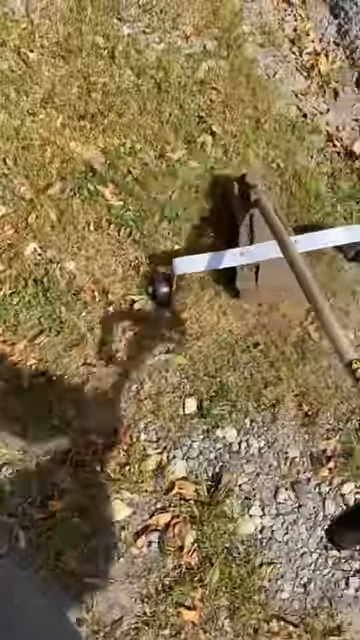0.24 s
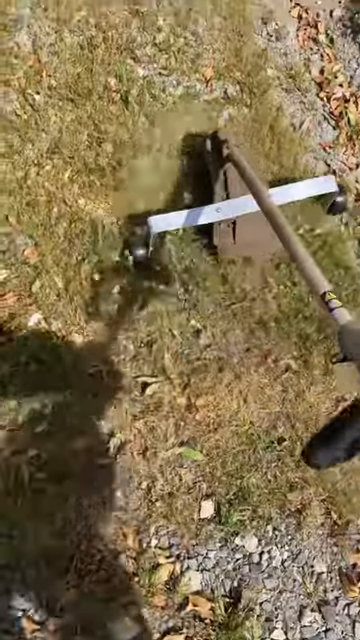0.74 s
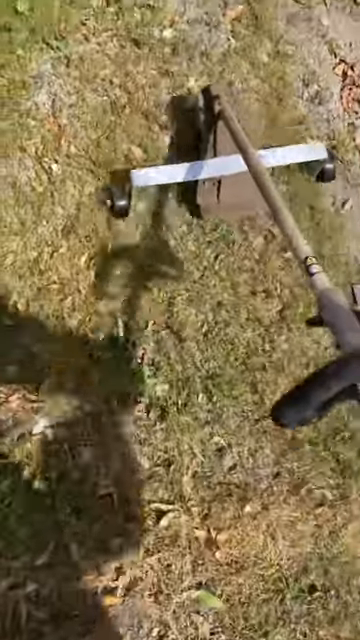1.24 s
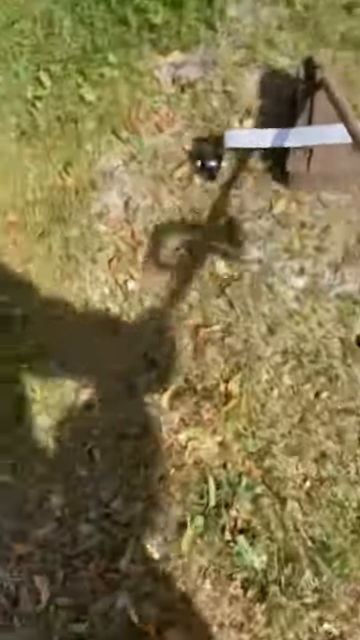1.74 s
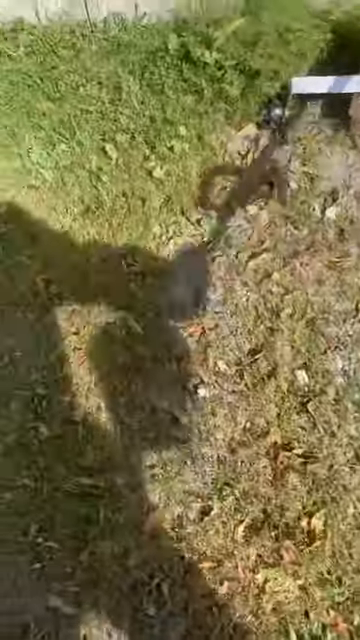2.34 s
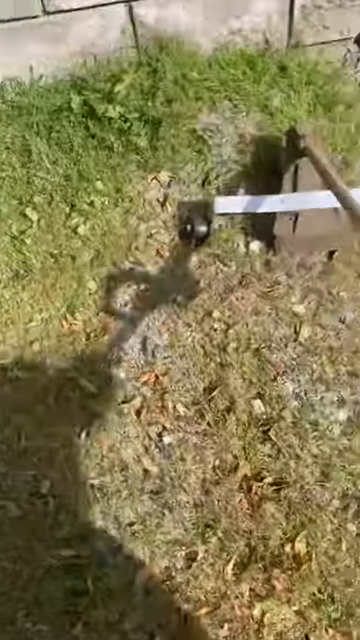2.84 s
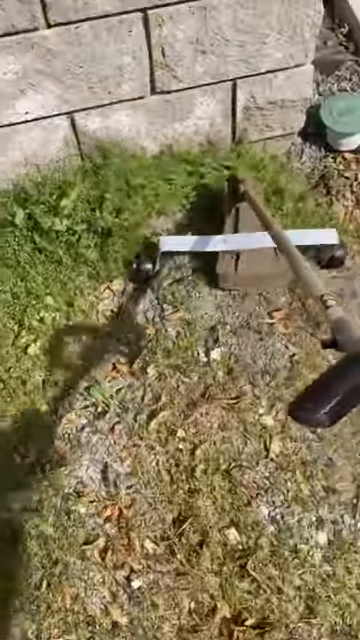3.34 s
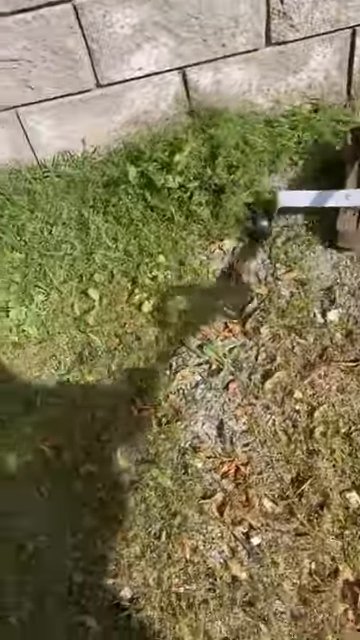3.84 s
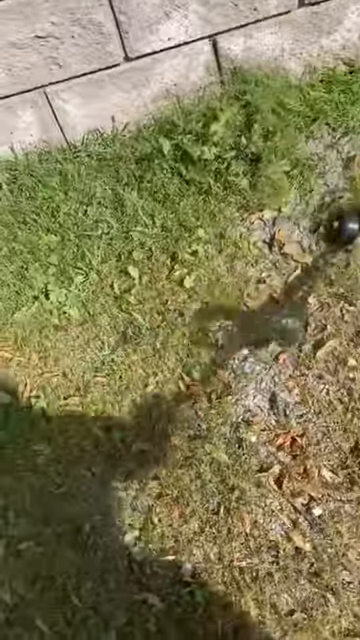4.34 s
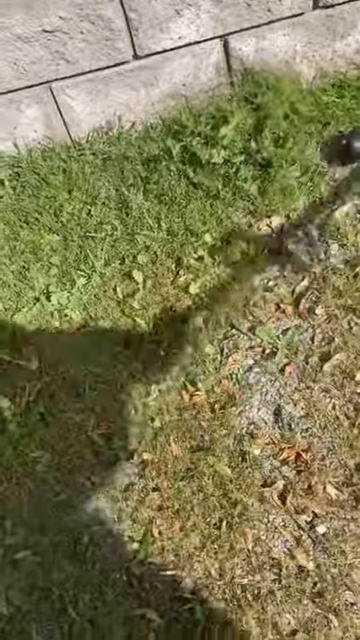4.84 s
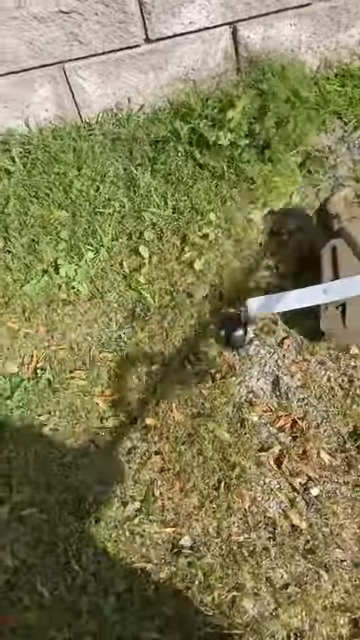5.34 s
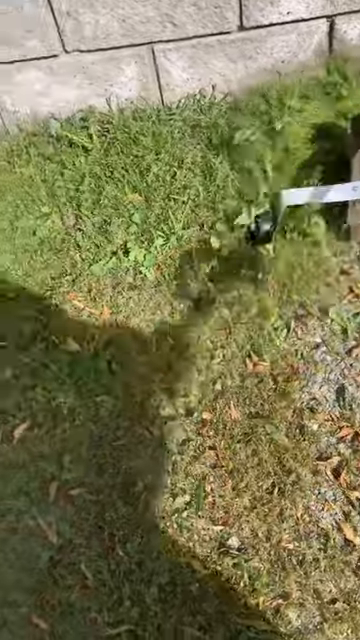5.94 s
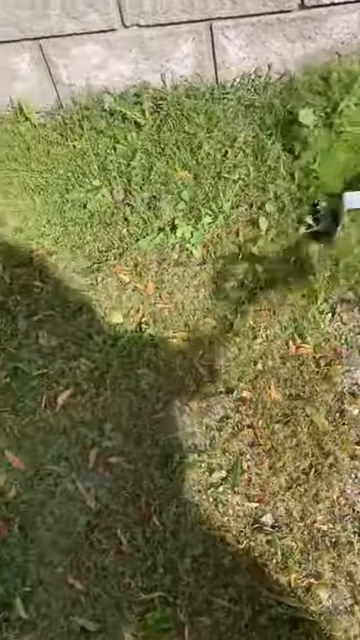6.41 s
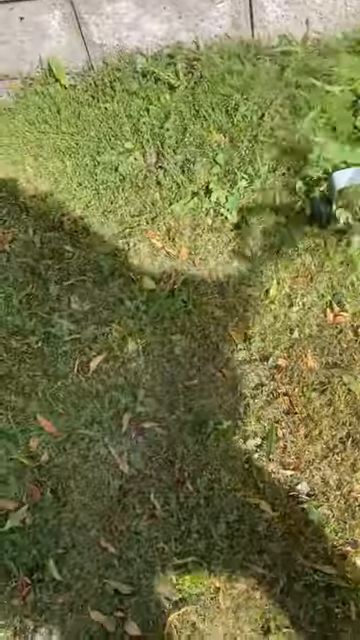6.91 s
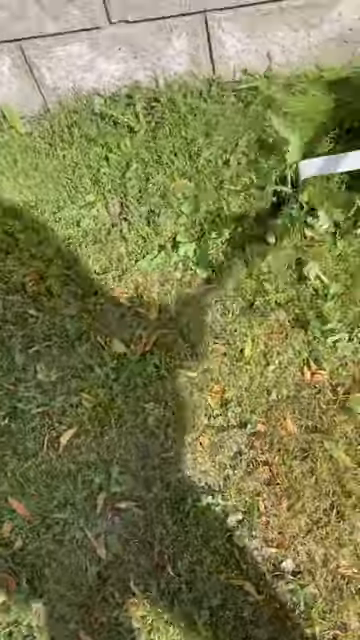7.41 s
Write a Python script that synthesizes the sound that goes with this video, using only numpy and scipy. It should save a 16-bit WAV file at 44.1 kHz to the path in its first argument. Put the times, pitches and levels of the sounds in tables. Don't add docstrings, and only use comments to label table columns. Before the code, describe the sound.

A small two-stroke engine rasps and whines without pause, its pitch dipping briefly when the head bites into dense grass near a stone wall. Above it the cutting strands whip past with dense, sizzling hiss and crisp shredding. Bright isolated ticks and one hard burst come from flung stones. Close, dry outdoor stereo from a body-worn microphone, engine and head spread differently, with light wind bumps.

```python
import sys
import numpy as np
from scipy import signal
from scipy.fft import rfft, irfft
from scipy.io import wavfile
from scipy.ndimage import uniform_filter1d

SR = 44100
rng = np.random.default_rng(int(sys.argv[2]) if len(sys.argv) > 2 else 0)


def gain_from_db(level_db):
    decades = np.asarray(level_db, float) / 20
    return 10 ** decades


def unload_audio(sound):
    columns = np.transpose(np.atleast_2d(sound))
    steps = np.round(np.clip(columns, -1, 1) * 32767)
    wavfile.write(sys.argv[1], SR, steps.astype(np.int16))


N = 338247
GEAR = 1.4


def rms_one(x):
    return x / np.sqrt(np.mean(x ** 2) + 1e-20)


def in_time(rows):
    s, *columns = np.transpose(rows)
    return [np.interp(np.arange(N) / SR, s, c) for c in columns]


def drift(rate_hz):
    pole = np.exp(-80 * np.pi * rate_hz / SR)
    noise = rng.standard_normal(N // 40 + 2002)
    slow = signal.lfilter([1], [1, -2 * pole, pole * pole], noise)[2000:]
    return np.interp(np.arange(N) / 40, np.arange(len(slow)), rms_one(slow))


def coloured(x, spectrum, patchy_db):
    hz = np.fft.rfftfreq(N, 1 / SR) + 1
    point_hz, point_db = np.transpose(spectrum)
    shaped = rfft(x) * gain_from_db(np.interp(np.log(hz), np.log(point_hz), point_db, -70, -70))
    half_octave = 2 * np.log2(hz / point_hz[0])
    bands = int(2 * np.log2(point_hz[-1] / point_hz[0])) + 2
    out = 0
    for k in range(bands):
        share = np.clip(1 - np.abs(half_octave - k), 0, 1)
        out = out + irfft(shaped * share, N) * gain_from_db(patchy_db * drift(16))
    return rms_one(out)


def grains(spread_db, per_s):
    sizes = gain_from_db(spread_db * np.minimum(rng.exponential(1, N), 4)) * rng.choice([-1, 1], N)
    return rms_one(sizes * (rng.random(N) < per_s / SR))


def gate(turns, sharp):
    return rms_one(np.exp(sharp * np.cos(2 * np.pi * turns)))


def order(turns, level_db, apart_db, phase):
    angle = 2 * np.pi * (turns + rng.random())
    apart = gain_from_db(apart_db + 2.7 * drift(2.4)) * np.sin(angle + phase)
    return np.sqrt(2) * (gain_from_db(level_db) * np.sin(angle) + apart * [[1], [-1]])


def ports(x, lead, left_db):
    half = np.exp(.5j * np.interp(np.fft.rfftfreq(N, 1 / SR), *np.transpose(lead)))
    pair = np.array([irfft(rfft(x) * half, N), irfft(rfft(x) / half, N)])
    return pair * gain_from_db([[left_db / 2], [-left_db / 2]])


# t/s, firing rate f/Hz
SPEED = [(0, 147.6), (.14, 148.6), (.26, 147.7), (.67, 147.8), (.81, 146.6), (1.11, 149), (1.51, 149),
         (1.63, 148.2), (1.79, 148.9), (2.14, 147), (2.37, 148.4), (2.9, 148.1), (3.07, 146.8),
         (3.25, 148.1), (3.42, 148.1), (3.55, 145), (3.66, 142), (3.78, 146), (3.92, 148.7), (4.23, 148.2),
         (4.4, 148.2), (4.57, 148.6), (4.72, 147.7), (4.81, 148.5), (5.25, 148.9), (5.53, 147.7),
         (5.69, 145), (5.8, 143.4), (5.99, 147.1), (6.11, 148.1), (6.48, 147.7), (6.65, 146.2), (6.85, 148),
         (6.99, 147), (7.38, 148), (7.5, 143), (7.6, 140.5), (7.67, 141)]


def engine_turns():
    return np.cumsum(in_time(SPEED)[0]) / SR


# t/s, third-order level/dB, sixth-order level/dB
ENGINE = [(0.0, -46, -54), (0.06, -32.5, -43), (0.21, -40.5, -45), (0.43, -36.5, -36), (0.83, -39.5, -47),
          (0.96, -37, -40), (1.13, -37.5, -45), (1.24, -36.5, -38), (1.32, -37, -48), (1.62, -34, -39),
          (1.69, -34.5, -48), (1.86, -33.5, -43), (2.05, -40, -34), (2.14, -35, -56), (2.18, -35.5, -47),
          (2.69, -40, -47), (2.76, -35, -54), (2.8, -38, -39.5), (3.57, -29.5, -43.5), (3.61, -32, -46),
          (3.82, -28, -39), (3.93, -36.5, -41), (4.27, -45.5, -46), (4.42, -27.5, -38.5),
          (4.49, -30.5, -46), (4.7, -28.5, -43), (4.85, -33, -47), (4.89, -28, -40.5), (5.08, -31.5, -38.5),
          (5.21, -54, -52), (5.26, -40, -57), (5.3, -41, -43), (5.51, -47, -43), (5.53, -53, -35),
          (5.66, -41.5, -43), (5.9, -33, -37.5), (5.96, -32, -50), (6.0, -36, -41), (6.26, -55, -38),
          (6.32, -38.5, -52), (6.37, -47, -49), (6.43, -39, -44), (6.47, -41, -49), (6.51, -35, -39),
          (6.58, -36, -50), (6.69, -30, -39), (6.86, -37, -49), (6.96, -35.5, -40.5), (7.18, -44.5, -50),
          (7.22, -52, -47), (7.28, -42, -53), (7.46, -33.5, -47), (7.54, -57, -44), (7.67, -45, -45)]
# multiple of the firing rate [1], level/dB, follows third (0) to sixth (1) order [1],
# port difference level/dB, its phase [rad]
EXHAUST = [(1, -20.5, 0.46, -88, 3.1), (2, -29.5, 0, -82, 3), (3, 1.5, 0.062, -43.5, 1.67),
           (4, -10.5, 0, -60, 1.5), (5, -27, 1, -74, -8), (6, -2, 0.71, -46, -5.5),
           (7, -4, 0.96, -48.5, -1.1), (9, -14.5, 0.58, -54, 1), (15, -10, 0.83, -49.5, -2.7)]


def exhaust_tone(turns):
    third_db, sixth_db = in_time(ENGINE)
    turns = turns + .016 * drift(30)
    out = 0
    for k, level_db, high, apart_db, phase in EXHAUST:
        level_db = level_db + (1 - high) * third_db + high * sixth_db + 2.07 * drift(14.5)
        out = out + order(k * turns, level_db, apart_db, phase)
    return out


# t/s, level/dB
GAS = [(0.0, -35), (0.13, -37), (1.0, -41), (1.81, -41), (1.96, -39), (2.29, -37.5), (2.56, -39.5),
       (3.33, -39.5), (3.67, -38), (4.12, -41), (4.83, -39), (5.04, -39.5), (5.26, -40.5), (5.47, -41.5),
       (5.85, -40), (6.02, -41), (6.56, -40), (7.26, -41.5), (7.67, -37)]
# f/Hz, level/dB
RASP = [(100, -14.5), (320, -13), (390, -2.5), (500, 2), (700, 0), (1000, 1.5), (1400, -0.5), (2200, -1),
        (3200, -1.5), (5000, -15)]
# f/Hz, lead [rad]
ENGINE_LEAD = [(300, -1.3), (800, 0), (1500, -1.44), (2300, -1.5), (3500, -3), (5000, -4)]
# f/Hz, lead [rad]
TURNED_LEAD = [(300, -2.2), (800, -0.5), (1500, -1), (2000, -2), (2700, -3.1), (5000, -5)]
# t/s, share turned [1]
TURNING = [(0, 0), (4.6, .1), (5.9, 0.92), (7.67, 0.96)]


def exhaust_rasp(turns):
    puffs = gate(turns, .17) * rng.standard_normal((3, N))
    rasp = coloured(puffs[0], RASP, 1.5)
    turned = np.clip(in_time(TURNING)[0], 0, 1)
    direct = (1 - turned) * ports(rasp, ENGINE_LEAD, 0.86) + turned * ports(rasp, TURNED_LEAD, 1.0)
    scattered = coloured(puffs[1:], RASP, 1.5)
    high_pass = signal.butter(2, 950, "high", fs=SR, output="sos")
    scattered = signal.sosfilt(high_pass, scattered)
    return gain_from_db(in_time(GAS)[0] + 6.5) * (direct + gain_from_db(-2.5) * scattered)


# t/s, strand tone level/dB, hiss level/dB, shredding level/dB, whip crack over hiss level/dB
HEAD = [(0.0, -48, -19.5, -36, -9), (0.02, -43, -20, -35, -12), (0.19, -45, -23.5, -32.5, -8),
        (0.4, -46, -22, -34.5, -1.5), (0.58, -53.5, -26.5, -38, -3.5), (1.28, -42.5, -27, -34.5, -1),
        (1.69, -41, -28, -42, -4.5), (1.79, -40, -26, -33, -4.5), (1.96, -44, -26.5, -41, -9),
        (2.11, -44, -28, -33.5, -2), (2.16, -43.5, -28.5, -40, -5), (2.18, -51, -27, -39, -7.5),
        (2.48, -51, -27, -40, -5.5), (2.58, -42, -27.5, -37, -4.5), (3.07, -42.5, -27, -35, -7.5),
        (3.18, -42, -26, -45, -7), (3.22, -46, -26, -57, -5), (3.27, -48, -28, -35, -11),
        (3.29, -48, -27, -44, -1), (3.42, -48, -26, -37, -12), (3.48, -57, -25.5, -32, -15),
        (3.54, -38.5, -26, -28, -8), (3.65, -41, -27.5, -25.5, -8), (3.76, -55, -26.5, -33.5, -9),
        (3.84, -44, -27, -39, -9), (3.97, -41, -28, -38.5, -4), (4.46, -40, -27.5, -42, -9.5),
        (4.8, -39, -29.5, -36, -8), (5.13, -42, -26.5, -39, -8.5), (5.15, -39, -27.5, -45, -12),
        (5.28, -46, -24.5, -47.5, -8), (5.57, -42.5, -25.5, -36.5, -7.5), (5.68, -39, -25, -31, -7),
        (5.7, -40, -24.5, -35, -7), (5.85, -45, -27, -30, -8.5), (5.9, -56, -27, -31.5, -7),
        (5.98, -57.5, -27.5, -39.5, -13), (6.07, -62, -28.5, -37, -7), (6.13, -62, -27.5, -49, -3.5),
        (6.22, -43, -28, -32.5, -13), (6.3, -51, -26, -46, -10), (6.37, -43, -27.5, -31.5, -9),
        (6.45, -66.5, -27, -48, -8), (6.53, -47, -26.5, -36, -7), (6.58, -64, -27.5, -33, -13),
        (6.62, -51, -25, -30, -7), (6.79, -48.5, -28.5, -38, -1), (6.88, -53, -26.5, -43, -13),
        (7.18, -48, -27, -35.5, -9.5), (7.24, -60, -26, -34, -6), (7.37, -53, -24.5, -43.5, -7),
        (7.43, -35.5, -27.5, -29, -5.5), (7.63, -38.5, -27, -30.5, -5), (7.67, -39, -26, -36, -13)]


def cutting_head(turns):
    tone_db, hiss_db, shred_db, crack_db = in_time(HEAD)
    return strand_tone(turns, tone_db) + strand_noise(turns, hiss_db, shred_db, crack_db)


# t/s, level/dB
THIRD_PASS = [(0.0, -36.5), (0.53, -38.5), (0.75, -44), (0.94, -40.5), (2.26, -43), (2.43, -34.5),
              (2.88, -51.5), (3.44, -37), (3.63, -42), (3.99, -40), (4.18, -48), (4.51, -44), (5.0, -44),
              (5.23, -45), (5.4, -41.5), (5.6, -46), (6.02, -40.5), (6.24, -54), (6.56, -37.5), (7.09, -50),
              (7.33, -42), (7.67, -44)]
# multiple of head turns [1], level/dB, port difference level/dB, its phase [rad]
HEAD_ORDERS = [(1, -62.5, -69, -3), (4, -47, -50, 2)]


def strand_tone(turns, tone_db):
    out = order(2 * turns, tone_db + .8 * drift(12), -58.5, -1.5)
    out += order(6 * turns, in_time(THIRD_PASS)[0] - 1.5 + 1.2 * drift(13), -51.5, 3.0)
    for k, level_db, apart_db, phase in HEAD_ORDERS:
        out += order(k * turns, level_db + 2.1 * drift(15), apart_db, phase)
    return out


# f/Hz, level/dB
HISS = [(3000, -24), (4000, -12), (5000, -12.5), (5600, -7.5), (6500, -1.5), (7400, -3), (8400, -2),
        (10000, -3.5), (12000, -7), (13500, -13), (16000, -19)]
# f/Hz, level/dB
WHIP = [(4500, -24.5), (6200, -6.5), (7200, -4.5), (8500, 6.5), (9600, 1.5), (11000, -5.5), (13000, -20)]
# f/Hz, level/dB
SHRED = [(600, -49), (1500, 7.5), (3000, 3), (4500, 11), (8000, -0.5), (16000, -96)]
# f/Hz, level/dB
SPRAY = [(9000, -41), (12500, 3), (14000, 6), (16000, -16)]
# f/Hz, lead [rad]
HEAD_LEAD = [(300, 0), (3000, -5.4), (4200, -4.5), (5400, -3.14), (8350, 0), (12000, 3.14), (15200, 6.28),
             (20000, 9)]


def strand_noise(turns, hiss_db, shred_db, crack_db):
    turns = turns + .45
    passes = gate(2 * turns, 0.081) * gate(turns, 0.083)
    hiss = coloured(passes * rng.standard_normal(N), HISS, 1.05)

    pass_strength = gain_from_db(2.2 * np.clip(rng.standard_normal(2000), -3, 1.1))
    strength = pass_strength[(2 * turns + .5).astype(int)]
    cracks = gate(2 * turns, 1.6) * gate(turns, .6) * strength * rng.standard_normal(N)
    hiss = hiss + gain_from_db(crack_db) * coloured(cracks, WHIP, 2.5)

    spray = gain_from_db(0.68 * shred_db - 13) * coloured(passes * grains(3.6, 6000), SPRAY, 3.8)
    bits = np.array([grains(3.0, 9000) for k in range(3)])
    shred, *scattered = gain_from_db(shred_db - 1.5) * coloured(passes * bits, SHRED, 2.5)
    echoes = coloured(passes * rng.standard_normal((2, N)), HISS, 2.7)

    near = ports(gain_from_db(hiss_db + 2.0) * hiss + spray + shred + strikes(), HEAD_LEAD, 0)
    return near + gain_from_db(-5) * np.array(scattered) + gain_from_db(hiss_db - 12) * echoes


# t/s, peak level/dB
STRIKES = [
    (.1075, -7),
    (1.5825, -13),
    (2.189, -3),
    (2.194, -6),
    (2.1955, -8),
    (3.6785, -9),
    (6.6395, -13),
    (7.0695, -13),
]


def strikes():
    s, peak_db = np.transpose(STRIKES)
    clicks = np.zeros(N)
    clicks[(s * SR).astype(int)] = gain_from_db(peak_db)
    crack = rng.standard_normal(90) * np.exp(-np.arange(90) / 9.)
    bright = signal.butter(2, [5000, 15000], "band", fs=SR, output="sos")
    crack = signal.sosfilt(bright, crack)
    return signal.fftconvolve(clicks, crack / np.abs(crack).max())[:N]


# t/s, peak level/dB
THUMPS = [
    (0.798, -50),
    (2.19, -31),
    (2.53, -46),
]


def thumps():
    t, out = np.arange(3000) / SR, np.zeros(N)
    cycles = 45 * t + 280 * 0.00903 * (1 - np.exp(-t / 0.0082))
    sweep = np.sin(2 * np.pi * cycles) * t / 0.014 * np.exp(1 - t / 0.015)
    for s, peak_db in THUMPS:
        out[int(s * SR):][:3000] += gain_from_db(peak_db) * sweep
    return out


# t/s, level/dB
WIND = [(0.0, -50), (0.04, -63), (0.1, -54), (0.15, -67), (0.28, -54), (0.32, -72), (0.49, -48),
        (0.58, -56), (0.64, -51), (0.68, -67), (0.72, -47), (0.77, -52), (0.79, -47), (0.81, -40),
        (0.87, -70), (1.09, -68), (1.18, -58), (1.21, -63), (1.28, -61), (1.32, -69), (1.54, -66),
        (1.56, -71), (1.71, -57), (1.77, -70), (2.16, -61), (2.2, -34), (2.22, -36), (2.26, -73),
        (2.33, -57), (2.43, -64), (2.54, -42), (2.56, -55), (3.12, -66), (3.14, -67), (3.29, -63),
        (3.4, -50), (3.44, -55), (3.48, -47), (3.59, -56), (3.63, -56), (3.74, -52.5), (3.82, -67),
        (4.14, -63), (4.4, -47), (4.44, -64), (4.51, -49.5), (4.57, -60), (4.68, -65), (4.78, -56),
        (4.87, -64), (5.11, -60), (5.28, -81), (5.36, -68), (5.55, -65), (5.6, -80), (5.62, -64),
        (5.77, -44), (5.81, -65), (6.02, -61), (6.07, -54), (6.19, -87), (6.28, -66), (6.37, -49),
        (6.41, -81), (6.45, -63), (6.56, -61), (6.6, -82), (6.64, -49.5), (6.71, -70), (6.94, -57),
        (6.99, -50), (7.05, -46), (7.09, -56), (7.13, -60), (7.18, -48), (7.28, -49), (7.33, -68),
        (7.41, -54), (7.52, -60), (7.67, -59)]
# f/Hz, level/dB
GUST = [(20, -20), (40, -17), (65, -6), (120, -16), (250, -12.5), (400, -30)]


def wind():
    shared, own = rng.standard_normal(N), rng.standard_normal((2, N))
    level_db = in_time(WIND)[0] + [[.3], [1.7]]
    return gain_from_db(level_db) * coloured(shared + 1.2 * own, GUST, 1.6)


def scene():
    turns = engine_turns()
    engine = exhaust_tone(turns) + exhaust_rasp(turns)
    return engine + cutting_head(turns / GEAR) + wind() + thumps()


# f/Hz, louder of sum and difference over the rounding step level/dB
FINENESS = [(700, 24), (1300, 9), (1900, 4), (3000, 2), (4700, 2), (5700, 6), (8000, 9), (10000, 7),
            (12500, 3), (14500, -2.5)]
BAND_EDGES = np.r_[0:40:4, 40:96:8, 96:144:12, 144, 160, 176, 196, 216, 240, 264, 292, 320:1025:32]
# t/s, f/Hz
MONO_BELOW = [(0, 760), (1.15, 740), (1.45, 540), (1.8, 500), (1.9, 320), (2.55, 260), (2.65, 130),
              (3.3, 110), (3.5, 30), (7.67, 15)]


def recorder_storage(dry):
    size, start = 1024, 308
    pair = np.array([dry[0] + dry[1], dry[0] - dry[1]]) / 2
    pair = np.pad(pair, ((0, 0), (size + start, 3 * size)))

    at, k = np.arange(2 * size), np.arange(size) + .5
    window = signal.windows.kaiser_bessel_derived(2 * size, 4 * np.pi)
    basis = window[:, None] * np.cos(np.pi / size * np.outer(at + .5 + size / 2, k))
    starts = np.arange(0, pair.shape[1] - 2 * size, size)
    lines = pair[:, starts[:, None] + at] @ basis
    hz, s = k * SR / (2 * size), (starts[:, None] - start) / SR

    band = np.searchsorted(BAND_EDGES, k) - 1
    power = np.add.reduceat(lines ** 2, BAND_EDGES[:-1], axis=2) / np.diff(BAND_EDGES)
    level_db = 10 * np.log10(power + 1e-20)
    whim_db = 3.4 * uniform_filter1d(rng.standard_normal(level_db.shape), size=3, axis=1)
    louder_db = level_db.max(axis=0)
    masker_db = .5 * louder_db + .5 * np.median(louder_db, axis=0)
    step = gain_from_db((masker_db + whim_db[0])[:, band] - np.interp(hz, *np.transpose(FINENESS)))
    sharp = np.abs(s - STRIKES[3][0]) < .024
    rounded = np.sign(lines) * np.floor(np.abs(lines) / step + .4) * step
    lines = np.where(sharp, lines, rounded)

    side_over_db = (level_db[1] - level_db[0] + whim_db[1])[:, band]
    limit_db = np.where((hz < 4600) | (hz > 9000), 5.8, 8.5)
    lines[0] *= ((side_over_db < limit_db) | (hz < 2300) | sharp) & (hz < 15800)
    over_masker_db = (level_db[0] - masker_db + whim_db[0])[:, band]
    lines[0] *= (hz < 13000) | sharp | (over_masker_db > -3.6)

    lines[1] *= ((side_over_db > -6) & (hz < 13780) | (hz < 7580) | sharp) & (hz < 15800)
    lines[1] *= hz > np.interp(s, *np.transpose(MONO_BELOW))

    frames = lines @ basis.T * 2 / size
    joined = (frames[:, 1:, :size] + frames[:, :-1, size:]).reshape(2, -1)
    mid, side = joined[:, start:start + N]
    return np.array([mid + side, mid - side])


def roll_off(x):
    return signal.sosfilt(signal.butter(12, 17010, fs=SR, output="sos"), x)


def record(dry):
    mix = recorder_storage(dry)
    return roll_off(mix)


dry = scene()
out = record(dry)
unload_audio(out)
```